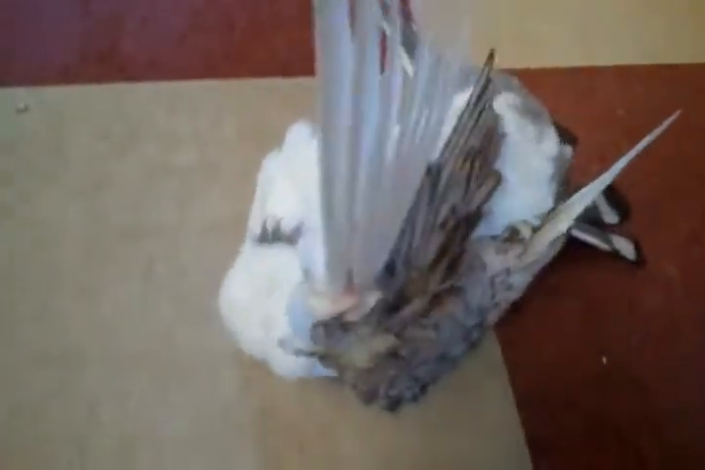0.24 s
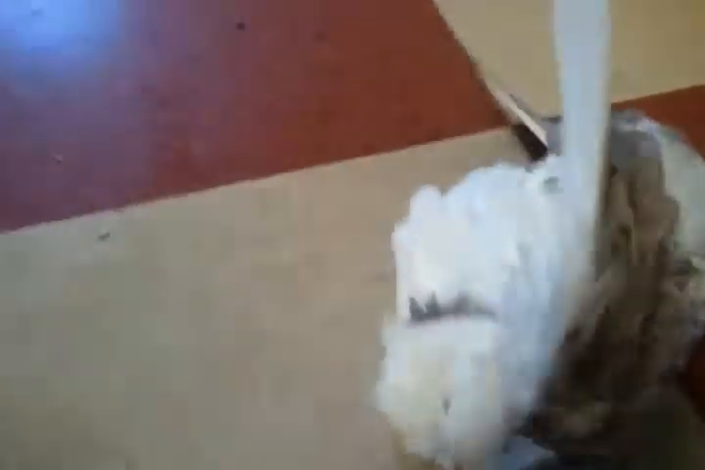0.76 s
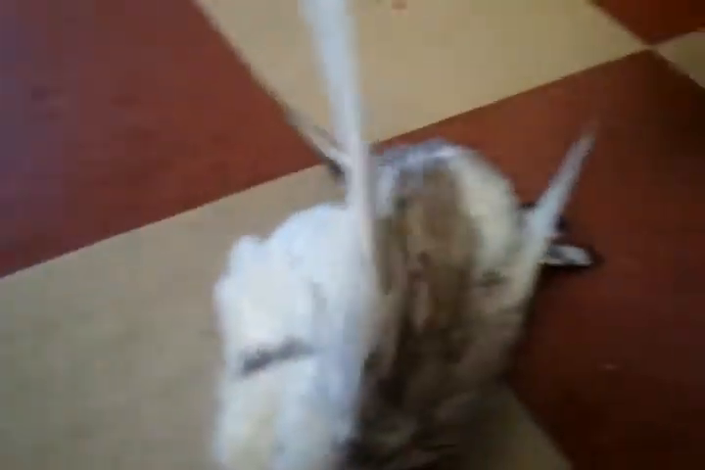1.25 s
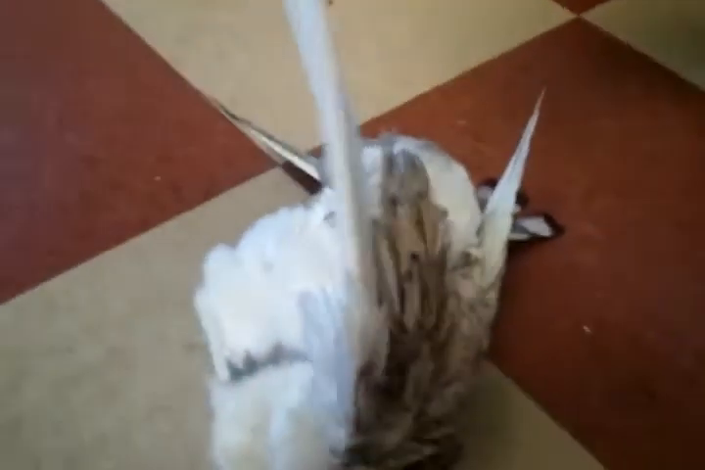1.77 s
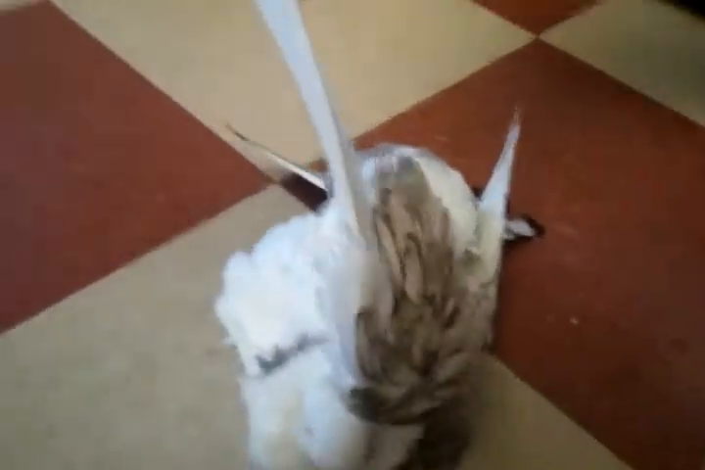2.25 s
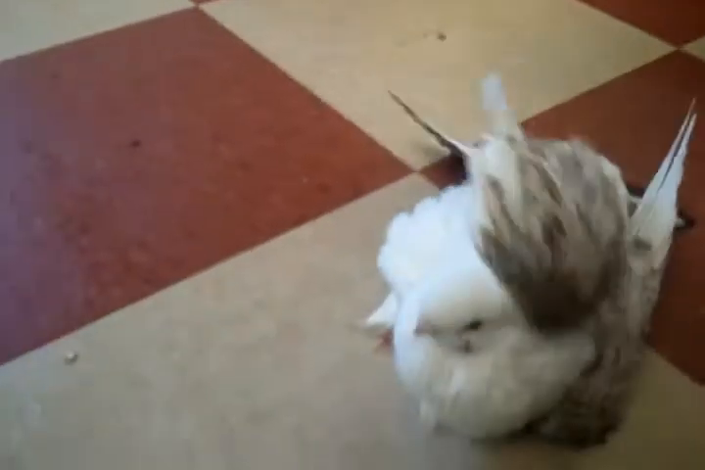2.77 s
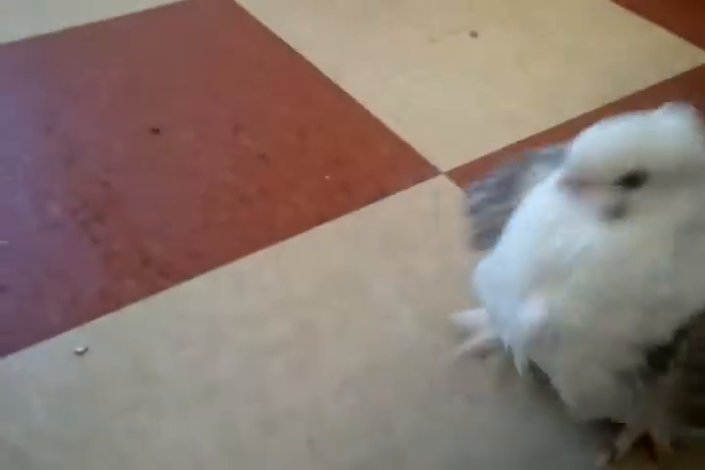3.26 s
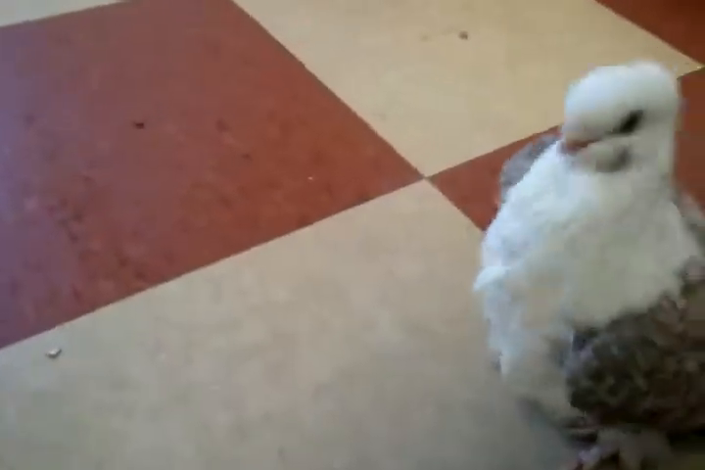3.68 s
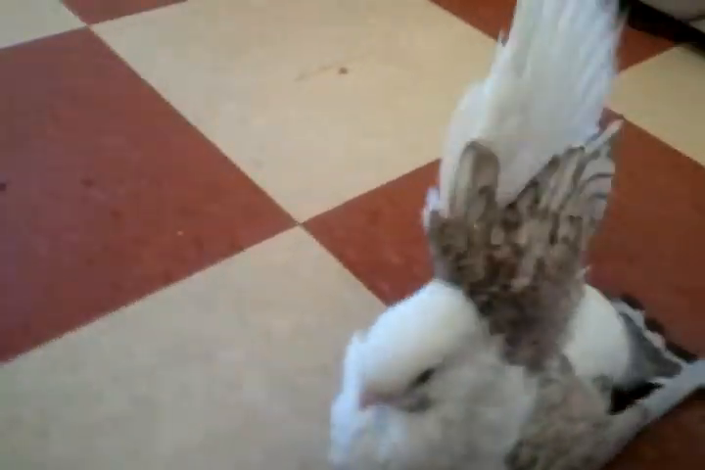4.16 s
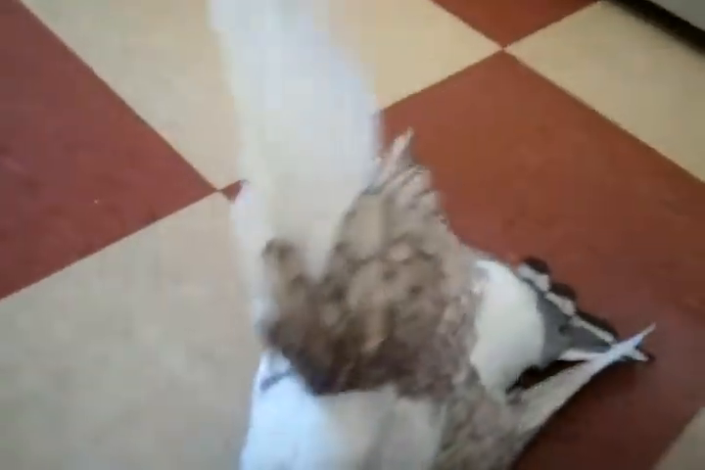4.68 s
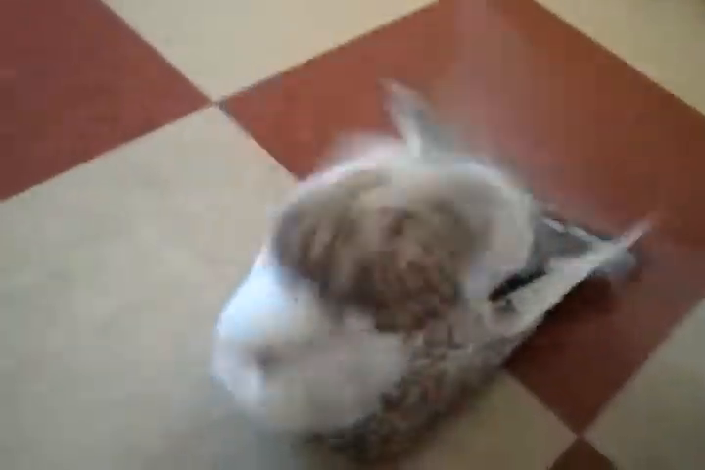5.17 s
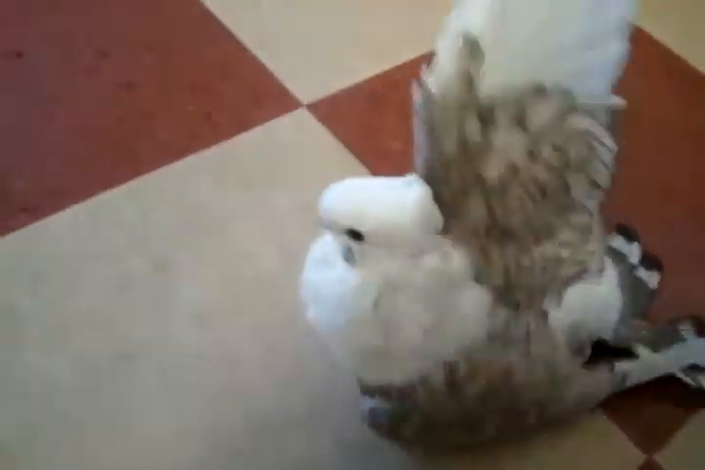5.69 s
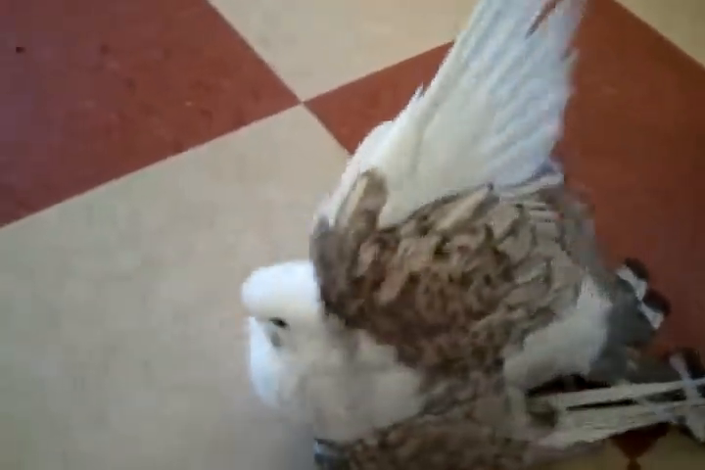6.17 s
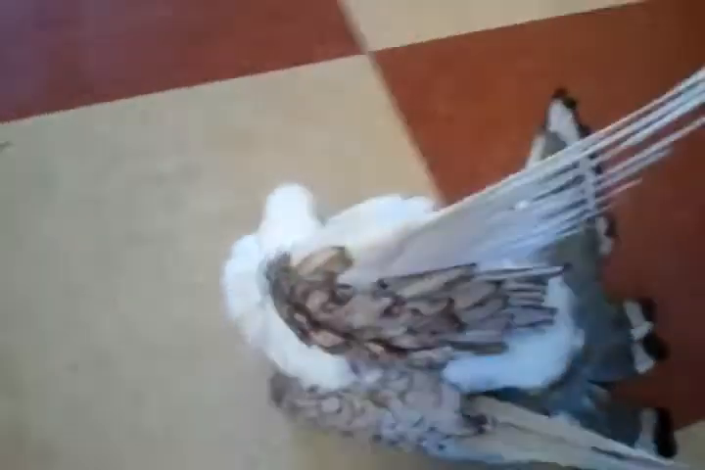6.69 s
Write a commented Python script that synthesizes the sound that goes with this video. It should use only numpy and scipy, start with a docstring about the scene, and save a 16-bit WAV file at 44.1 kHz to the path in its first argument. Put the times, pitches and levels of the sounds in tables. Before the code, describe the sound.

Rasping spray bursts at quick, regular intervals give way to light misting, plastic and claw ticks, faint cheeps, knocks and a sudden bird shriek.

```python
"""Misting a pigeon in a tiled room

Close to a small microphone, a trigger bottle mists a pigeon on the tiled floor of a hard room.
The first hard pulls sputter in runs of noise bursts; later ones are soft hisses of coloured noise.
The trigger clacks and its hinge squeaks in stacked overtones; small noise puffs make the claws tick.
Far off, knocks ring and another bird cheeps in gliding whistles, then screeches once in rough harmonics,
loud enough to overload the microphone."""
import sys
import numpy as np
from scipy import signal
from scipy.io import wavfile

SR = 44100
rng = np.random.default_rng(int(sys.argv[2]) if len(sys.argv) > 2 else 0)


def int16_out(signal):
    """Quantize to a 16-bit WAV file."""
    q = np.round(np.clip(np.atleast_2d(signal).T, -1, 1) * 32767)
    wavfile.write(sys.argv[1], SR, q.astype(np.int16))


N = 305613   # length [samples]


def amp(db):
    """Decibels to an amplitude factor."""
    return 10 ** (np.asarray(db) / 20)


def rms_one(x):
    """Scale to an rms of 1."""
    return x / np.sqrt(np.mean(x ** 2) + 1e-20)


def in_time(rows):
    """Join the rows of a table by straight lines, one curve for each column after the time."""
    s, *columns = np.transpose(rows)
    return [np.interp(np.arange(N) / SR, s, column) for column in columns]


def band(x, low_hz, high_hz):
    """Keep what lies between two frequencies."""
    sos = signal.butter(2, [low_hz, min(high_hz, SR / 2.2)], "band", fs=SR, output="sos")
    return signal.sosfilt(sos, x)


def drift(rate_hz):
    """Smoothed random wandering with an rms of 1; a higher rate wanders faster."""
    r = np.exp(-2 * np.pi * rate_hz / SR)
    wander = signal.lfilter([1], [1, -2 * r, r * r], rng.standard_normal(N + SR))
    return rms_one(wander[SR:])   # the first second lets the filter settle


def coloured(spectrum, flicker_db, rate_hz):
    """Noise in bands 0.4 octave wide that flicker partly together; rms 1."""
    hz, db = np.transpose(spectrum)
    edges = 22 * 2 ** np.arange(0, 9, .4)
    white = rng.standard_normal((2, N))
    together = drift(rate_hz)
    own = [drift(rate_hz) for _ in range(3)]
    out = 0
    for k, (low, high) in enumerate(zip(edges, edges[1:])):
        level_db = np.interp(np.log(low * high) / 2, np.log(hz), db)
        flicker = flicker_db * (together + own[k % 3])
        out = out + amp(level_db + flicker) * band(white[k % 2], low, high)
    return rms_one(out)


def add(out, s, x):
    """Lay a sound into the track at a time in seconds."""
    i = round(s * SR)
    out[i:i + len(x)] += x[:N - i]


def burst(bright_hz, low_hz, low_db, t60, spread, low_spread):
    """A puff of noise, a bright band over a low one; longer puffs also rise more slowly."""
    t, t60 = np.arange(3000) / SR, max(t60, .005)
    shape = (1 - np.exp(-t / (0.016 * t60))) * amp(-60 * t / t60)
    noise = rng.standard_normal((2, len(t))) * shape
    bright = band(noise[0], bright_hz / spread, bright_hz * spread)
    low = band(noise[1], low_hz / low_spread, low_hz * low_spread)
    both = bright / np.linalg.norm(bright) + amp(low_db) * low / np.linalg.norm(low)
    return both * np.linalg.norm(shape)


# the close bottle's hisses, from trigger pulls and from short spurts that trail some clicks:
# (start [s], full flow [s], end [s], nozzle hiss [dB], gush in the bottle neck and on the feathers [dB])
PULLS = [(-.04, 0.05, .11, -22, -28), (0.238, .32, .38, -32, -25.5), (.512, 0.568, .64, -35, -28),
         (0.776, 0.849, .9, -31, -28), (1.035, 1.088, 1.17, -30.5, -26.5), (1.317, 1.4, 1.44, -25, -26),
         (1.581, 1.664, 1.722, -32, -26.5), (2.56, 2.645, 2.703, -33, -42),
         (2.886, 2.928, 2.985, -36.5, -46.5), (3.035, 3.045, 3.085, -40.5, -46.5),
         (3.161, 3.201, 3.285, -34, -42.5), (3.31, 3.317, 3.39, -42.5, -50),
         (5.16, 5.199, 5.29, -25.5, -35.5), (5.411, 5.432, 5.53, -31.5, -40),
         (6.18, 6.263, 6.28, -49, -46.5), (6.276, 6.312, 6.44, -35.5, -41), (6.489, 6.54, 6.67, -43, -41.5),
         (6.566, 6.573, 6.582, -31.5, -57), (6.762, 6.777, 6.779, -18, -32.5),
         (6.784, 6.787, 6.826, -19.5, -30.5)]
# colour of the nozzle hiss: (frequency [Hz], relative level per Hz [dB])
HISS = [(900, -23), (1600, -23), (2700, -14), (4000, -9), (6000, -3), (7500, -2), (10000, -5)]
# colour of the gush: (frequency [Hz], relative level per Hz [dB])
GUSH = [(18, -38.5), (40, -9), (100, -20), (240, -10), (520, -15.5), (1050, -7), (1400, -9), (1900, -6),
        (2600, -8), (4500, -10.5), (8000, -46)]
# flow at the end of a pull, before the 0.84 power; it dies away over this share of the pull's length
FLOW_LEFT, DRIBBLE = 0.44, 0.39


def mist():
    """Smooth hiss of the nozzle over a lumpier gush; flow swells, sags and dies away."""
    t, hiss, gush = np.arange(N) / SR, np.zeros(N), np.zeros(N)
    for start, full, end, hiss_db, gush_db in PULLS:
        dry_out = end + DRIBBLE * (end - start)
        flow = np.interp(t, np.sort([start, full, end, dry_out]), [0, 1, FLOW_LEFT, 0]) ** 0.84
        hiss += amp(hiss_db) * flow
        gush += amp(gush_db) * flow ** 0.77
    return hiss * coloured(HISS, 0.99, 65.0) + gush * coloured(GUSH, 2.7, 90.)


# the trigger clacks just before a hard pull: (time [s], nominal peak before the cap [dB])
CLACKS = [(0.2187, -12), (0.4869, -8), (.7395, -8.5), (1.0154, -11), (1.2869, -12.5), (1.57, -13)]
CLACK_LOW_DB = -15   # low part re peak
# when the nine air pockets of a run burst: time after the first, before stretch and delay [s]
POCKET_S = [0, .017, .0305, .0453, .0603, .0753, .093, .112, .1345]
# strength and colour of the same nine: (peak re the run [dB], low part re peak [dB])
POCKETS = [(-5, -15), (-6, -19.5), (-1, -19), (-1, -17), (-0.5, -11.5), (0.5, -8), (2, -12), (-3, -10.5),
           (-4, -9)]
# one run for each hard pull: (first pocket [s], stretch [factor], extra delay of the last two pockets [s])
RUNS = [(-.0117, 1.005, .001), (.2402, .985, -.001), (.5262, 1.07, .008), (.7883, 1.06, .002),
        (1.044, .985, -.002), (1.3203, .985, .001), (1.5874, .995, .003)]
# strength of those runs: (nominal peak [dB], small pockets in between re peak [dB])
RUN_DB = [(-7.5, -7.5), (-7.5, -5), (-12, -18), (-10.5, -5.5), (-7.5, -4), (-9.5, -7), (-10, -2.5)]
BETWEEN_SHARE, BETWEEN_LOW_DB = .52, -6.5   # small pockets: mean place in the gap, low part re peak
POCKET_SPREAD_DB = 2.0   # chance in strength


def pockets():
    """Rows (time [s], peak [dB], low part [dB]) of the clacks, the pockets and the small pockets between."""
    shape_db, low_db = np.transpose(POCKETS)
    rows = [(s, db, CLACK_LOW_DB) for s, db in CLACKS]
    for (first, stretch, delay), (db, between_db) in zip(RUNS, RUN_DB):
        last_two = np.arange(len(POCKET_S)) >= len(POCKET_S) - 2
        s = first + stretch * np.array(POCKET_S) + delay * last_two
        chance_db = POCKET_SPREAD_DB * rng.standard_normal((2, len(s)))
        rows += zip(s, db + shape_db + chance_db[0], low_db)
        share = BETWEEN_SHARE + rng.uniform(-.15, .15, len(s) - 1)
        between = s[:-1] + np.diff(s) * share
        between_peak_db = db + between_db + shape_db + chance_db[1]
        rows += [(at, peak_db, BETWEEN_LOW_DB) for at, peak_db in zip(between, between_peak_db)]
    return [row for row in rows if row[0] >= 0]


LOUDEST_POCKET_DB = -9   # cap on the nominal peak of pockets and clacks


def sputter():
    """Pockets of air burst through the nozzle, each at a pitch of its own; the clacks are made alike."""
    out, rows = np.zeros(N), pockets()
    for (s, db, low_db), pitch in zip(rows, rng.standard_normal((len(rows), 2))):
        bright_hz = 7500 * np.exp(.12 * pitch[0])
        low_hz = 1500 * np.exp(.15 * pitch[1])
        puff = burst(bright_hz, low_hz, low_db, t60=0.02, spread=1.496, low_spread=1.93)
        add(out, s, amp(min(db, LOUDEST_POCKET_DB)) * puff)
    return out


# small close clicks of plastic, claws and feathers:
# (time [s], nominal peak [dB], bright centre [Hz], low centre [Hz], low part re peak [dB])
TICKS = [(1.847, -24, 6400, 1050, -13), (1.9154, -26, 7010, 1070, -7), (2.1622, -28, 6360, 1400, -7.5),
         (2.381, -37, 3290, 501, -15), (2.5595, -37, 4900, 2350, -1), (2.7712, -23.5, 6660, 1350, -11.5),
         (2.797, -36.5, 6590, 1270, 6.5), (2.8501, -14.5, 7000, 1090, -13.5),
         (2.8594, -23.5, 4050, 1000, -3.5), (3.0238, -38, 3370, 2600, 4), (3.038, -18.5, 7450, 674, -11),
         (3.059, -32, 4500, 1200, -4), (3.1322, -27, 5100, 1240, -11), (3.3134, -15.5, 7100, 1780, -6.5),
         (3.327, -27, 5000, 1400, -4), (3.4396, -34, 5100, 1260, -2), (3.4656, -39, 4140, 2100, 4.5),
         (3.5733, -37.5, 4000, 1420, -0.5), (3.7261, -26, 7240, 2350, -17),
         (3.8116, -36.5, 3810, 1740, 9.5), (4.0295, -38, 5700, 759, -30), (4.0773, -32.5, 6400, 1440, 0.5),
         (4.134, -37.5, 3160, 2090, 7), (4.1726, -45.5, 3590, 538, 12), (4.202, -44.5, 3500, 1400, 0),
         (4.498, -42, 3810, 1290, 4), (4.6859, -26.5, 5290, 1750, -3), (4.709, -20.5, 3700, 1380, -9.5),
         (4.7476, -34.5, 3550, 1180, -6), (5.123, -33, 4000, 1410, -1.5), (5.3217, -13.5, 5370, 1060, -11),
         (5.3348, -30, 3470, 2765, 3), (5.3846, -20.5, 3800, 1920, -13), (5.5367, -23.5, 3350, 1140, -3.5),
         (5.5515, -18.5, 6820, 1120, -8.5), (5.5713, -17, 6900, 1120, -19),
         (5.5924, -25.5, 6200, 1450, -26), (5.6422, -16.5, 6760, 2240, -13.5),
         (5.7495, -33.5, 4440, 2750, 3), (5.758, -34.5, 4870, 2451, -9), (5.9732, -42.5, 4080, 1790, 2.5),
         (6.0003, -32.5, 3800, 2550, -12), (6.0362, -37.5, 3200, 2152, 2), (6.0636, -37.5, 3194, 2140, 2.5),
         (6.2197, -43, 4741, 1620, 7), (6.4263, -28, 4850, 1160, 3), (6.437, -30, 3000, 2100, 1),
         (6.4567, -23, 6490, 2300, -7), (6.5203, -15, 7500, 2680, -4), (6.624, -25, 4350, 2790, -9),
         (6.639, -11.5, 7100, 1510, -7), (6.6634, -18, 6660, 2240, -16), (6.7397, -20.5, 3700, 2650, -16),
         (6.7509, -17.5, 5740, 2200, -7), (6.9026, -19.5, 4584, 1314, -3)]
TICK_T60_S = 0.025


def ticks():
    """Hard small contacts of plastic, claw and quill, each a short puff of noise."""
    out = np.zeros(N)
    for s, db, hz, low_hz, low_db in TICKS:
        add(out, s, amp(db) * burst(hz, low_hz, low_db, TICK_T60_S, spread=1.72, low_spread=1.665))
    return out


# squeaks of the close trigger hinge: (start [s], end [s], mean slips per second [Hz], stack level [dB])
SQUEAKS = [(3.635, 3.696, 590, -55), (4.626, 4.706, 611, -49.5)]
# how the hinge weights the overtones: (frequency [Hz], level of an overtone [dB])
HINGE = [(600, -23), (1200, 1), (1800, -34), (2400, 2), (3050, -2), (3700, 1), (5000, -11), (7500, -11)]


def squeaks():
    """Regular slips of plastic on plastic give a stack of overtones, weighted by the hinge."""
    out, waver = np.zeros(N), 1 + .006 * drift(40.)
    for start, end, hz, db in SQUEAKS:
        along = np.linspace(0, 1, round((end - start) * SR))
        slips_hz = hz * waver[round(start * SR):][:len(along)]
        phase = 2 * np.pi * np.cumsum(slips_hz) / SR
        stack = 0
        for k in range(1, 13):
            weight = amp(np.interp(k * hz, *np.transpose(HINGE)))
            stack = stack + weight * np.sin(k * phase + rng.uniform(0, 2 * np.pi))
        add(out, start, amp(db) * np.sin(np.pi * along) ** 0.22 * stack)
    return out


# the far bird's screech: (time [s], fundamental before jitter [Hz], nominal level [dB], roughness [0-1])
SCREECH = [(4.783, 2740, -63, 0), (4.799, 2777, 2, 0.23), (4.804, 2490, -4.5, 0.27),
           (4.822, 2500, -8.5, 0.53), (4.855, 2257, -11.5, 0.46), (4.874, 2549, -13, 0.57),
           (4.884, 2326, -14, 0.47), (4.914, 2304, -11, 0.45), (4.935, 1804, -16, 0.15),
           (4.95, 1990, -63, .4)]
LOWEST_DB, FOURTH_DB = -13, 7   # lowest harmonic re the second, before sinking; fourth re the third
UPPER_DB, UPPER_DB_PER_ROUGH = -16.5, 24   # the upper harmonics grow with roughness
RATTLE_HZ = 515.6   # mean rate


def screech(jitter=0.033, shimmer_db=3.0, half_db=-18, rasp_db=-12):
    """Four jittering harmonics, strong and weak cycles alternating; the throat rattles and hisses when rough."""
    hz, db, rough = in_time(SCREECH)
    phase = 2 * np.pi * np.cumsum(hz * (1 + jitter * rough * drift(170.0))) / SR
    lowest_db = LOWEST_DB + 0.062 * np.minimum(hz - 2500, 0)   # the beak radiates less as the pitch sinks
    upper_db = UPPER_DB + UPPER_DB_PER_ROUGH * rough
    tone = 0
    for k, level_db in enumerate([lowest_db, 0, upper_db, upper_db + FOURTH_DB], 1):
        tone = tone + amp(level_db + shimmer_db * rough * drift(230.0)) * np.sin(k * phase)
    alternation = 1 + amp(half_db) * np.sin(phase / 2)
    rattle = np.sin(2 * np.pi * np.cumsum(RATTLE_HZ * (1 + .15 * drift(60.1))) / SR)
    tone = tone * alternation * (1 + 2.0 * rough * rattle)
    rasp = amp(rasp_db) * rough * rms_one(band(rng.standard_normal(N), 1800, 7300))
    t = np.arange(N) / SR
    sounding = (t > SCREECH[0][0]) & (t < SCREECH[-1][0])
    return amp(db) * sounding * (tone + rasp)


# far cheeps, before waver and shake:
# (start [s], end [s], pitch from [Hz], pitch to [Hz], level [dB], second harmonic re first [dB])
CHEEPS = [(2.339, 2.388, 1880, 1622, -42, -10), (2.41, 2.487, 1845, 1920, -54.5, -7),
          (2.496, 2.554, 2445, 2533, -38.5, -8), (2.508, 2.55, 4350, 4330, -50, -30),
          (2.565, 2.595, 2510, 2460, -55, -13)]


def cheeps():
    """Gliding whistles with two overtones, shaky in pitch and level."""
    out, shake, waver = np.zeros(N), amp(4.0 * drift(90.)), 1 + .012 * drift(60.)
    for start, end, from_hz, to_hz, db, overtone_db in CHEEPS:
        along = np.linspace(0, 1, round((end - start) * SR))
        glide_hz = from_hz + (to_hz - from_hz) * along
        phase = 2 * np.pi * np.cumsum(glide_hz * waver[:len(along)]) / SR
        overtones = np.sin(2 * phase) + 0.57 * np.sin(3 * phase)
        tone = np.sin(phase) + amp(overtone_db) * overtones
        add(out, start, amp(db) * np.sin(np.pi * along) ** .5 * tone)
    return out * shake


# knocks somewhere in the room, away from the microphone: (time [s], ring [Hz], level [dB], t60 [s])
KNOCKS = [(2.385, 485, -42, 0.15), (2.43, 464, -49, 0.085), (2.61, 235, -30.5, 0.11),
          (2.608, 154, -42.5, 0.17), (2.8, 232, -35.5, 0.068), (3.04, 590, -41, 0.22),
          (5.549, 238, -34.5, 0.055), (6.639, 482, -33, 0.029), (2.561, 1295, -30.5, 0.029),
          (2.802, 1360, -44, .12), (3.817, 1825, -41, 0.082)]


def knocks():
    """Each knock is one decaying ring."""
    out, t = np.zeros(N), np.arange(SR // 2) / SR
    for s, hz, db, t60 in KNOCKS:
        rise = 1 - np.exp(-t / 0.00036)
        add(out, s, amp(db - 60 * t / t60) * rise * np.sin(2 * np.pi * hz * t))
    return out


# colour of the background in the room: (frequency [Hz], relative level per Hz [dB])
ROOM_TONE = [(15, -36.5), (60, -13), (150, -6), (400, -4.5), (700, -7), (1700, -10.5), (4000, -14),
             (7000, -14), (10000, -14)]
ROOM_TONE_DB = -50   # rms before the microphone


def room_tone():
    """Faint, nearly steady coloured noise."""
    return amp(ROOM_TONE_DB) * coloured(ROOM_TONE, 0.17, 21.0)


ROOM_T60_S = 0.44


def room(x):
    """A dense dying tail of unit energy that starts after the first wall."""
    t = np.arange(SR) / SR
    tail = rng.standard_normal(SR) * amp(-60 * t / ROOM_T60_S) * (t > .004)
    return signal.fftconvolve(x, tail / np.linalg.norm(tail))[:N]


NEAR_WET_DB, FAR_WET_DB, MIST_WET_DB = -9.5, 0, -7   # sends into the room
WALL_ECHO_S, WALL_ECHO_DB = .0055, -15


def scene():
    """Close bottle and claws, far bird and knocks, all answered by the hard room."""
    spray = mist()
    near = sputter() + ticks() + squeaks()
    far = screech() + cheeps() + knocks()
    tail = room(amp(NEAR_WET_DB) * near + amp(FAR_WET_DB) * far + amp(MIST_WET_DB) * spray)
    add(tail, WALL_ECHO_S, amp(WALL_ECHO_DB) * near)   # the nearest wall answers once, clearly
    return (near + far + spray + tail + room_tone())[None]


CAPSULE_UP, CAPSULE_DOWN, OVERLOAD = 0.84, 0.85, .71   # clip levels [full scale]
MIC_LOW_HZ, MIC_TOP_HZ, MIC_END_HZ, CUTOFF_HZ = 45, 8020, 9447, 15990


def record(dry):
    """The capsule clips both ways at nearly the same level, deep bass and high treble go, last peaks are cut."""
    capsule = np.clip(dry, -CAPSULE_DOWN, CAPSULE_UP)
    narrow = signal.sosfilt(signal.butter(1, MIC_LOW_HZ, "high", fs=SR, output="sos"), capsule)
    narrow = signal.sosfilt(signal.butter(8, MIC_TOP_HZ, fs=SR, output="sos"), narrow)
    narrow = signal.sosfilt(signal.cheby2(12, 60, MIC_END_HZ, fs=SR, output="sos"), narrow)
    cut_flat = np.clip(narrow, -OVERLOAD, OVERLOAD)
    return signal.sosfilt(signal.cheby2(20, 70, CUTOFF_HZ, fs=SR, output="sos"), cut_flat)


dry = scene()
out = record(dry)
int16_out(out)
```